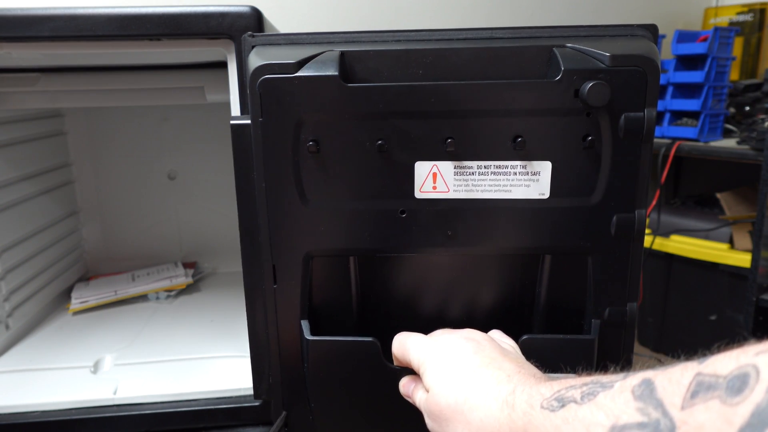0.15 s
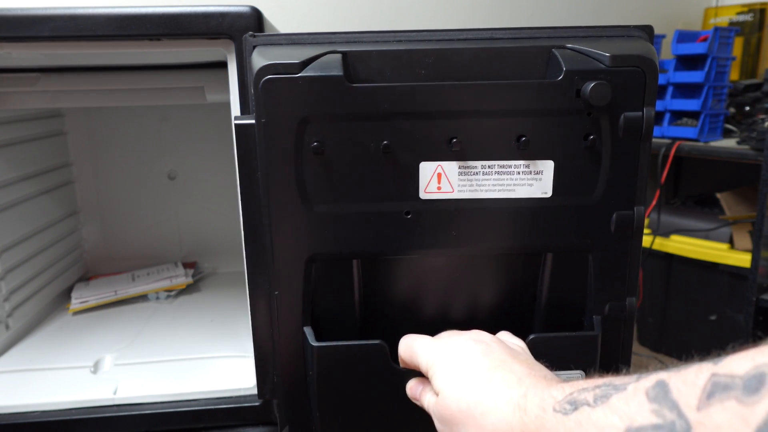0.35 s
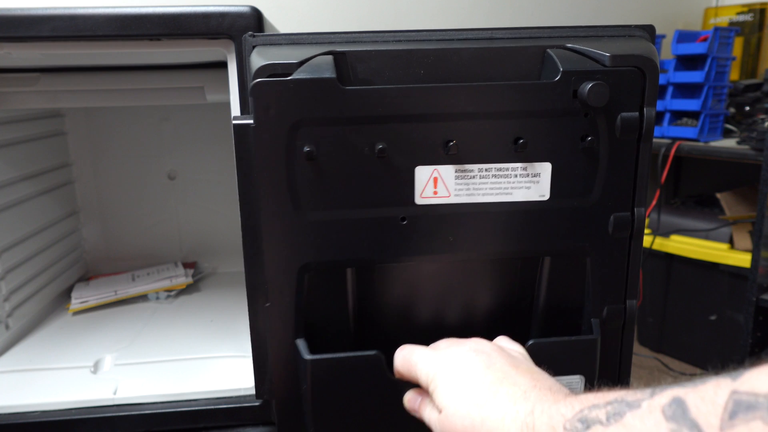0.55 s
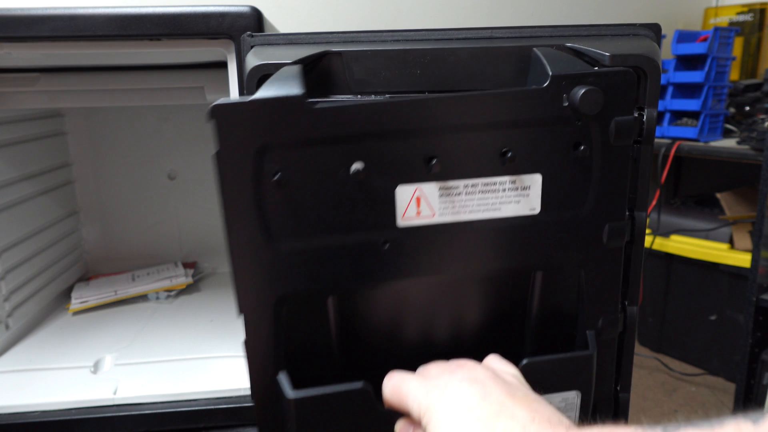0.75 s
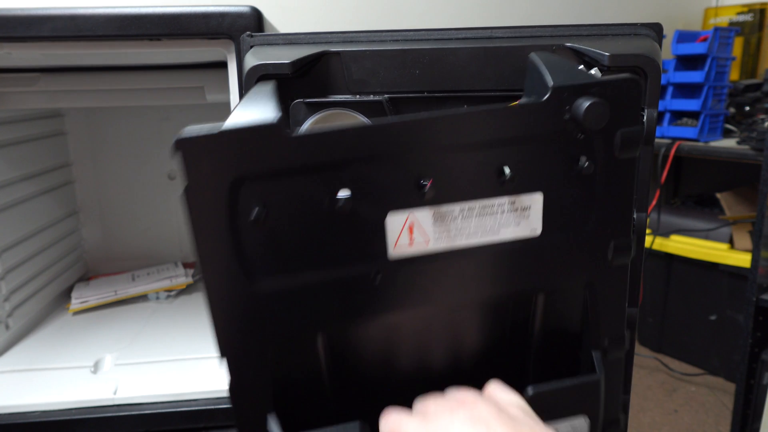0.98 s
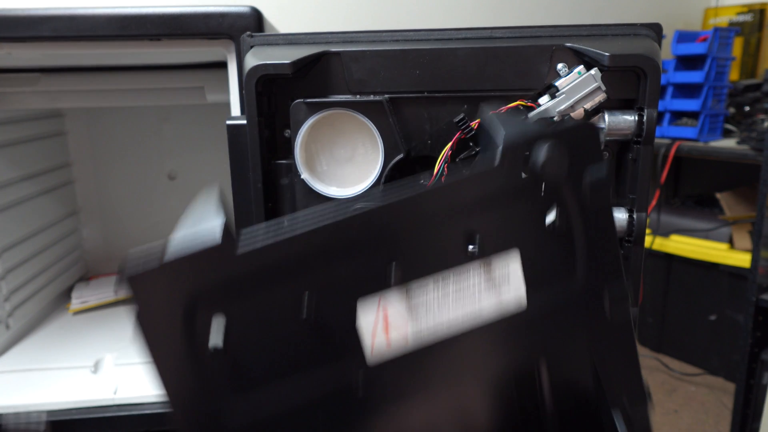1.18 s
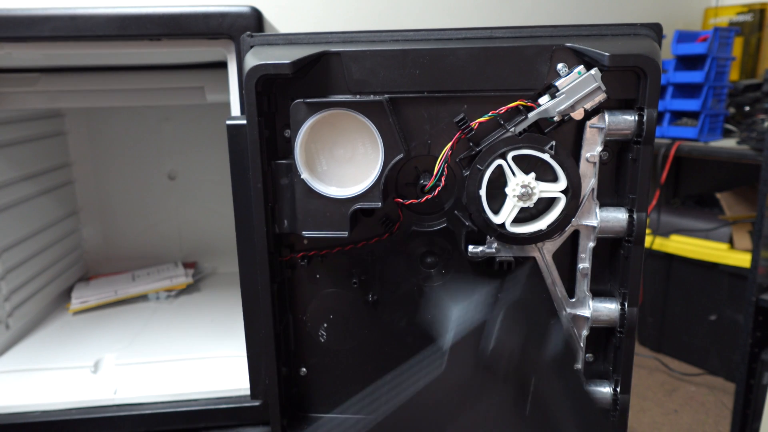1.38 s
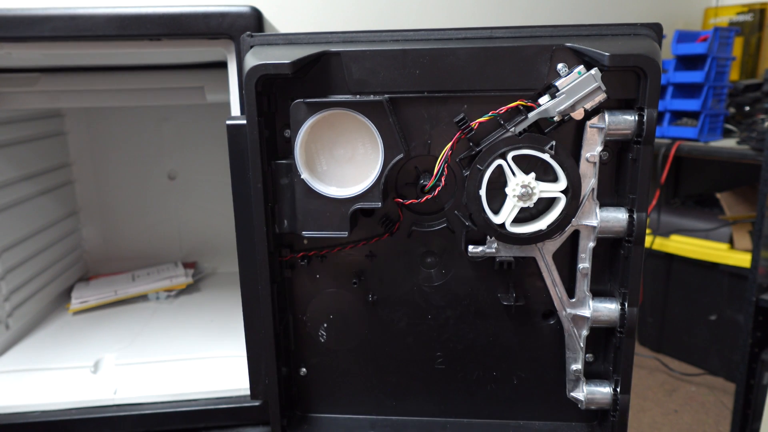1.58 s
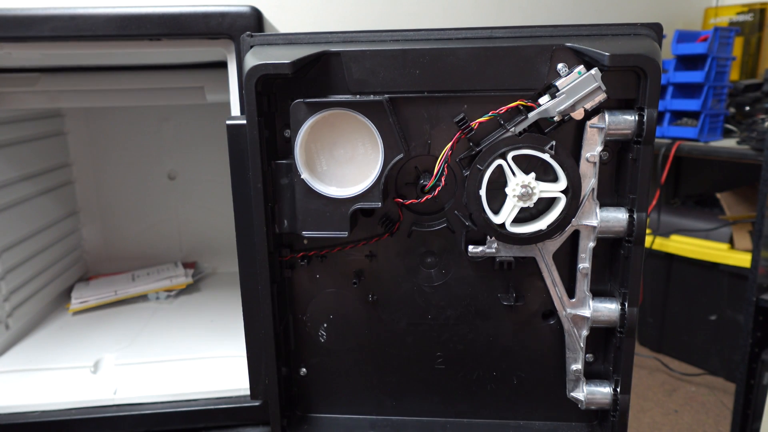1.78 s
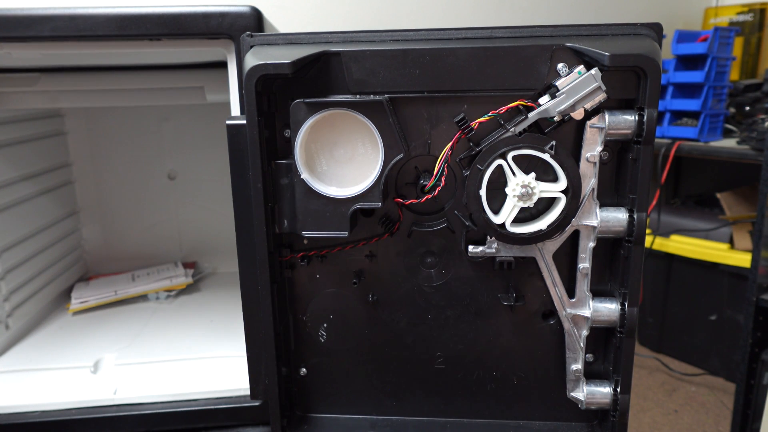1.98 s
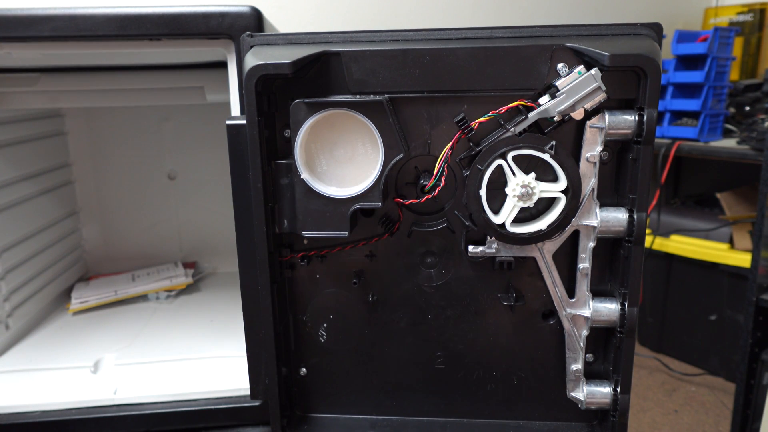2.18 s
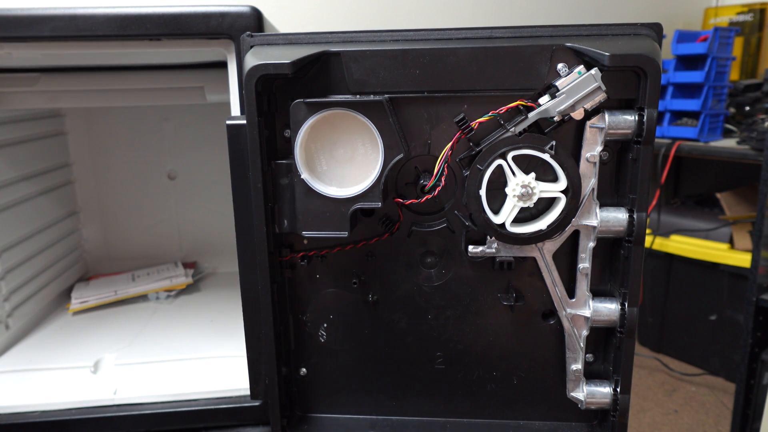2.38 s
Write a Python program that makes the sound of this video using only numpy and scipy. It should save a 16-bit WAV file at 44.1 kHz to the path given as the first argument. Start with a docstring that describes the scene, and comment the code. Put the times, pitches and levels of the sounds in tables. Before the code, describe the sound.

A hard plastic panel is pulled off a door, close in a small room with soft steady fan hum. After a faint knock at the start, a loud sharp snap at 0.24 s leads into rough grinding and hollow knocks, fading by 0.9. A quiet gap follows. At 1.47 it is set down with low thumps, bouncing until 1.85, sliding with a faint wavering squeak to 2.0; tiny metal clink at 2.14.

```python
"""A hand pulls a hard plastic panel off a metal door in a small room, while a fan hums throughout.
After faint knocks a clip snaps, and the panel grinds out of its seat with more knocks: each knock rings
the panel's own tones, and the grinding is a stream of tiny slips while the door booms along as low noise.
The panel is set down on the ground with low thumps, bounces, and slides with a faint squeak, a wavering
tone. Last, a small metal part clinks: short taps set its tones ringing. The fan is shaped noise with hum."""
import sys
import numpy as np
from scipy import signal
from scipy.fft import rfft, irfft, next_fast_len
from scipy.io import wavfile

SR = 44100
rng = np.random.default_rng(int(sys.argv[2]) if len(sys.argv) > 2 else 0)


def amplitude_ratio(level_db):
    """Convert a level in decibels to the matching linear amplitude (field) ratio."""
    exponent = np.asarray(level_db, float) / 20
    return 10 ** exponent


def wav_out(sig):
    """Save sig, one row per channel (or a flat mono array), as 16-bit PCM at SR to the path in sys.argv[1]."""
    wavfile.write(sys.argv[1], SR, np.round(np.clip(np.atleast_2d(sig).T, -1, 1) * 32767).astype(np.int16))


N = 108045

# how strongly the panel rubs while it is pulled out:
# (time [s], level at 250-1400 Hz [dB], level at 1400-4000 Hz [dB], level at 4-16 kHz [dB])
PULL_LEVELS = [(.244, -19.5, -19, -47), (.26, -14, -15.5, -28), (.30, -16, -16, -23.5),
               (.33, -16.5, -18, -25), (.37, -20.5, -22.5, -34.5), (.405, -18, -29.5, -40.5),
               (.425, -28.5, -23, -78), (.46, -18, -31, -47), (.50, -28.5, -33, -48),
               (.54, -35, -39.5, -51.5), (.575, -31.5, -38.5, -66), (.61, -35.5, -36.5, -50.5),
               (.63, -33.5, -27.5, -44), (.685, -31.5, -28, -40), (.72, -29.5, -56, -73),
               (.75, -40, -61, -76), (.80, -38, -45.5, -74.5), (.87, -51.5, -56.5, -62.5),
               (.95, -71.5, -69, -64)]
# colour of the grit and the cracks: (frequency [Hz], level per Hz [dB])
TREBLE_COLOUR = [(1800, -31.5), (3000, -8), (4200, 1.5), (6080, 0.5), (7930, -4), (8740, -1),
                 (10200, -14.5), (11800, -10), (13000, -15.5), (16500, -26.5)]


def rms_one(x):
    """Scale a signal to an rms (average strength) of 1."""
    return x / np.sqrt(np.mean(x ** 2) + 1e-20)


def in_time(rows):
    """Draw each column of a table as a curve over time, behind a gate open only within the table's span."""
    times, *columns = np.transpose(rows)
    t = np.arange(N) / SR
    to_nearest_end = np.minimum(t - times[0], times[-1] - t)
    gate = np.clip(to_nearest_end / 0.004, 0, 1)  # fades of 4 ms
    return [gate] + [np.interp(t, times, column) for column in columns]


def ring(x, hz, t60):
    """A unit click sets a sine of height 1 ringing; it fades by 60 dB in t60 seconds."""
    r = amplitude_ratio(-60 / (t60 * SR))
    w = 2 * np.pi * hz / SR
    return signal.lfilter([0, np.sin(w)], [1, -2 * r * np.cos(w), r * r], x + 1e-18)


def resonance(x, hz, width_hz):
    """A two-pole resonance favours sound near one frequency, with gain 1 at its top."""
    r = np.exp(-np.pi * width_hz / SR)
    top = np.array([1, 0, -1]) * (1 - r * r) / 2
    return signal.lfilter(top, [1, -2 * r * np.cos(2 * np.pi * hz / SR), r * r], x)


def coloured(x, points):
    """Shape a signal by a spectrum drawn on a log-frequency axis, then scale it to rms 1."""
    hz, db = np.transpose(points)
    f = np.fft.rfftfreq(len(x), 1 / SR) + 1
    gain = amplitude_ratio(np.interp(np.log(f), np.log(hz), db))
    return rms_one(irfft(rfft(x) * gain, len(x)))


def flutter(width_hz, size):
    """Slow random wandering of rms 1: noise through a two-pole low-pass."""
    r = np.exp(-np.pi * width_hz / SR)
    noise = rng.standard_normal(size + SR)
    return rms_one(signal.lfilter([1], [1, -2 * r, r * r], noise)[SR:])  # skip the filter's start


def grains(rate):
    """Random clicks of uneven size and either sign, on average `rate` per second."""
    spread_db = 2
    sizes = amplitude_ratio(spread_db * np.minimum(rng.exponential(1, N), 5)) * rng.choice([-1, 1], N)
    return sizes * (rng.random(N) < rate / SR)


def add(out, s, sound):
    """Mix a sound in at a time in seconds."""
    i = int(s * SR)
    out[i:i + len(sound)] += sound[:N - i]


def knocks():
    """Each knock rings the panel's tones near its colour, slightly shifted as the panel bends, with a dense
    body tail, a clack and a crack; softer contacts clack less, rise slower and colour narrower."""
    # knocks on the panel: (time [s], level [dB], centre of the contact's colour [Hz],
    # clack relative to the knock [dB], crack relative to the knock [dB], share of the full ring time [1])
    blows = [(.004, -15, 545, -40, -62, 0.4), (.005, -41, 1850, -72, -60, 0.82),
             (0.2418, 7, 840, -15, -9, 0.088), (0.279, 1, 595, -56, -45.5, 0.31),
             (0.321, 5, 825, -40, -50, 0.098), (0.388, -3.5, 690, -17, -41, 0.17),
             (.412, -1, 580, -19.5, -27, 0.22), (.417, 8.5, 640, -71.5, -43.5, 0.37),
             (.431, 0.5, 910, -37, -57, 0.28), (.463, -6, 1500, -11.5, -18.5, 0.13),
             (0.465, 7.5, 980, -37, -42, 0.15), (0.476, 7, 930, -41.5, -49, 0.14),
             (0.486, -7.5, 1010, -45, -46, 0.14), (.513, -14, 910, -25.5, -41, 0.21),
             (0.553, -30, 1030, -1.5, -1, 0.11), (.582, 6, 690, -46, -47, 0.17),
             (0.599, -10, 1000, -44, -60, 0.18), (0.6924, -15, 1200, -1, -18.5, 0.3),
             (.692, -12.5, 556, -41, -45, 0.88), (0.753, -13.5, 970, -13, -31, 0.43),
             (0.772, -13, 935, -15.5, -54, 0.27), (.857, -36.5, 1145, -11, -32, 0.24),
             (1.4649, -20.5, 1000, -17, -35.5, 0.14), (1.4688, -10, 1080, -17.5, -22, 0.33),
             (1.469, -18.5, 1850, -48.5, -65, 0.59), (1.478, -13.5, 1030, -12.5, -24, 0.37),
             (1.534, -33, 885, -6, -27, 0.4), (1.615, -23.5, 2880, -25.5, -18, 0.2),
             (1.618, -27.5, 2090, -40, -57.5, 0.41), (1.617, -32.5, 770, -26, -38, 1.0),
             (1.721, -12.5, 1500, -17.5, -29, 0.32), (1.73, -10.5, 1050, -29.5, -29, 0.36),
             (1.738, -6, 450, -48, -49.5, 0.23), (1.822, -21, 774, -32, -41, 0.54)]
    # tones of the panel: (frequency [Hz], level [dB], full 60 dB ring time before the share [s])
    panel_tones = [(355, -2, 0.23), (450, 2, 0.16), (594, 4, 0.13), (657, 2.5, 0.12), (842.7, 2.5, 0.12),
                   (1013, 8, 0.082), (1024, -3.5, 0.33), (1200, -10.5, 0.22), (1429, -6.5, 0.29),
                   (1850, -2.5, 0.17), (2090, -3, 0.22), (2610, -9.5, 0.077)]
    # hard edge of the contact: (frequency [Hz], width [Hz], level [dB])
    clack_peaks = [(2495, 120, 10), (2996, 410, 8), (3250, 250, -9)]
    hardest_rise_s, hardest_octaves = 0.00041, 1.31  # for a clack at 0 dB
    soft_slower, soft_narrower = 0.34, 0.21  # dB per dB of missing clack
    tone_spread_db, bend_share = 3, 0.02  # random level and pitch of each tone
    tones_db, body_db, tail_db = -7.5, -11.5, -17
    full_body_t60_s, clack_t60_s = 0.2, 0.024
    crack_t60_s, crack_tail_t60_s, crack_rise_s = 0.014, 0.071, 0.001

    out, t = np.zeros(N), np.arange(SR // 2) / SR
    for s, db, hz, clack_db, crack_db, share in blows:
        rise_s = hardest_rise_s * amplitude_ratio(-soft_slower * clack_db)
        rise = (1 - np.exp(-t / rise_s)) ** 2
        octaves = hardest_octaves * amplitude_ratio(soft_narrower * clack_db)

        tones = np.zeros(len(t))
        for f, tone_db, t60 in panel_tones:
            level_chance, bend_chance, phase = rng.standard_normal(3)
            # tones further from the knock's colour are weaker
            start_db = tone_db + tone_spread_db * level_chance - 5.66 * (np.log2(f / hz) / octaves) ** 2
            bent_hz = f * (1 + bend_share * bend_chance)
            tones += amplitude_ratio(start_db - 60 * t / (t60 * share)) * np.sin(2 * np.pi * bent_hz * t + phase)

        body = rng.standard_normal(len(t))
        for _ in range(3):
            body = resonance(body, hz, 2.07 * octaves * hz)
        tail = amplitude_ratio(-60 * t / (full_body_t60_s * share))
        body = rms_one(body) * tail

        edge_noise = rng.standard_normal(len(t))
        clack = rms_one(sum(amplitude_ratio(p) * resonance(resonance(edge_noise, f, w), f, 2 * w)
                            for f, w, p in clack_peaks))
        clack *= amplitude_ratio(-60 * t / clack_t60_s) + amplitude_ratio(tail_db) * tail

        crack = coloured(rng.standard_normal(len(t)), TREBLE_COLOUR)
        crack *= amplitude_ratio(-60 * t / crack_t60_s) + amplitude_ratio(tail_db - 60 * t / crack_tail_t60_s)
        crack *= np.minimum(t / crack_rise_s, 1)

        ringing = rise * (amplitude_ratio(tones_db) * tones + amplitude_ratio(body_db) * body)
        add(out, s, amplitude_ratio(db) * (ringing + amplitude_ratio(clack_db) * clack + amplitude_ratio(crack_db) * crack))
    return out


def rubbing(levels):
    """Dense small slips drive the panel's broad resonances; finer grit makes the treble."""
    # resonances under the rubbing, low and middle: (frequency [Hz], width [Hz], level [dB])
    low_peaks = [(418.4, 65, -6), (598, 83, 4), (630, 160, 1.5), (877, 150, 2), (976, 270, -1.5),
                 (1180, 230, -2)]
    mid_peaks = [(1430, 340, 0.5), (1840, 160, 1), (2270, 100, 0), (2774, 520, -3.5), (3047, 580, -4.5),
                 (3670, 1000, -12.5)]
    slips_per_s, grit_per_s = 1500, 21000

    def through(peaks):
        """Neighbouring resonances answer with opposite signs."""
        return rms_one(sum((-1) ** k * amplitude_ratio(p) * resonance(slips, f, w) for k, (f, w, p) in enumerate(peaks)))

    gate, low_db, mid_db, high_db = in_time(levels)
    slips = grains(slips_per_s)
    grit = coloured(grains(grit_per_s), TREBLE_COLOUR)
    return gate * (amplitude_ratio(low_db) * through(low_peaks) + amplitude_ratio(mid_db) * through(mid_peaks) + amplitude_ratio(high_db) * grit)


def door_boom():
    """The door rumbles while the panel grinds on it: low noise that follows the rubbing."""
    gate, db, *_ = in_time(PULL_LEVELS)
    rumble = rms_one(resonance(rng.standard_normal(N), 140, 170.0))
    return gate * amplitude_ratio(db - 19) * rumble  # 19 dB below the low rubbing


def squeak():
    """An edge sticks and slips: a wavering tone and a blurred band an octave up."""
    # the squeak's path: (time [s], pitch [Hz], level of the tone [dB], level of the octave band [dB])
    squeak_path = [(1.76, 1804, -37, -56), (1.80, 1810, -56, -49), (1.875, 1878, -38.5, -51.5),
                   (1.915, 1875, -50, -61), (1.93, 1840, -35, -64), (1.952, 1903, -34, -59),
                   (1.965, 1825, -52, -66), (2.02, 1850, -59, -71)]
    gate, hz, db, octave_db = in_time(squeak_path)
    phase = 2 * np.pi * np.cumsum(hz) / SR
    tone = (1 + flutter(70, size=N)) * np.sin(phase)
    octave = flutter(350, size=N) * np.sin(2 * phase)
    return gate * (amplitude_ratio(db) * tone + amplitude_ratio(octave_db) * octave)


def thumps():
    """Soft, unsteady low pushes of the door and the ground under the big blows: fading, wavering sines."""
    # low booms: (time [s], level [dB], frequency [Hz], 60 dB fade time [s])
    booms = [(0.24, -34.5, 60, .15), (1.47, -27.5, 163, 0.27), (1.467, -23, 231, 0.16),
             (1.47, -25, 338.7, 0.14), (1.476, -48.5, 60.3, 0.97), (1.62, -23, 169, 0.054),
             (1.646, -30.5, 213, 0.097), (1.74, -25, 235.2, 0.42), (1.784, -27.5, 336.3, 0.3),
             (1.732, -27, 426, 0.38), (1.814, -27.5, 227, 0.14), (1.853, -36, 229.6, 0.23)]
    waver_depth, waver_hz, rise_s = 0.4, 30, 0.0022
    out, t = np.zeros(N), np.arange(SR // 2) / SR
    for s, db, hz, t60 in booms:
        waver = waver_depth * (1 - np.exp(-t * waver_hz)) * flutter(waver_hz, size=len(t))
        # the same waver, run backwards, unsettles the phase
        tone = np.sin(2 * np.pi * hz * t + waver[::-1])
        add(out, s, amplitude_ratio(db - 60 * t / t60) * (1 + waver) * tone * np.minimum(t / rise_s, 1))
    return out


def clink():
    """A small metal part taps and bounces: a click with a short burst of noise rings its tones."""
    # taps of the metal part: (time [s], level [dB])
    taps = [(2.142, -33), (2.154, -45)]
    # tones of the metal part: (frequency [Hz], level [dB], 60 dB ring time [s])
    metal_tones = [(2961, -18, 0.37), (3127, -21.5, 0.33), (4370, -25.5, 0.2), (5130, -21, 0.033),
                   (5421, -19, 0.12), (6417, -19, 0.18), (6600, -15, 0.09), (6880, -27, 0.22),
                   (7350, -26, 0.25)]
    out, t = np.zeros(N), np.arange(SR // 2) / SR
    tap = (t == 0) + 0.19 * rng.standard_normal(len(t)) * np.exp(-t / 0.005)
    for s, db in taps:
        # each tone varies by 1.5 dB from tap to tap
        ringing = sum(amplitude_ratio(tone_db + 1.5 * rng.standard_normal()) * ring(tap, hz, t60)
                      for hz, tone_db, t60 in metal_tones)
        add(out, s, amplitude_ratio(db) * ringing)
    return out


def room(x):
    """Echoes between the walls: ten feedback delays, duller on every round."""
    t60_s, wall_cut_hz = 0.29, 9000
    size = next_fast_len(N + SR)
    w = 2 * np.pi * np.fft.rfftfreq(size)
    dull = 1 / (1 + 1j * w * SR / (2 * np.pi * wall_cut_hz))
    echoes = 0
    for k, lag_s in enumerate(rng.uniform(0.0087, 0.03, size=10)):
        one_round = amplitude_ratio(-60 * lag_s / t60_s) * dull * np.exp(-1j * w * lag_s * SR)
        echoes = echoes + (-1) ** k * one_round / (1 - one_round)  # all rounds added up
    return irfft(rfft(x, size) * echoes, size)[:N]


def background():
    """Fan air is noise with a drawn spectrum; mains hum is noise squeezed into narrow bands."""
    # colour of the fan air: (frequency [Hz], level per Hz [dB])
    air_colour = [(15, -38), (25, -4.5), (103, -9.5), (150, -4), (182, -3.5), (380, -9), (470, -9.5),
                  (854, -19.5), (1360, -20.5), (1880, -25.5), (16500, -41.5)]
    # mains hum: (frequency [Hz], level [dB])
    hum_tones = [(120, -70), (240, -59.5)]
    hum = sum(amplitude_ratio(db) * rms_one(resonance(rng.standard_normal(N), hz, 5.2)) for hz, db in hum_tones)
    return amplitude_ratio(-52.5) * coloured(rng.standard_normal(N), air_colour) + hum


def scene():
    """Panel and metal in the room, over the background; the thin panel radiates little bass."""
    # how strongly the panel slides on the ground:
    # (time [s], level at 250-1400 Hz [dB], level at 1400-4000 Hz [dB], level at 4-16 kHz [dB])
    slide_levels = [(1.74, -36, -54, -58), (1.80, -33.5, -43, -56.5), (1.86, -45, -49.5, -53.5),
                    (1.915, -41, -44.5, -56), (1.94, -30, -38.5, -65), (1.96, -32.5, -36.5, -53.5),
                    (1.985, -37, -34, -52.5), (2.03, -41, -48, -57.5), (2.07, -42.5, -49.5, -65),
                    (2.13, -46.5, -50, -59), (2.2, -54.5, -59.5, -58.5), (2.44, -70, -59.5, -70)]
    panel = knocks() + rubbing(PULL_LEVELS) + rubbing(slide_levels) + squeak()
    little_bass = signal.butter(4, 190, "high", fs=SR, output="sos")
    near = signal.sosfilt(little_bass, panel) + door_boom() + thumps() + clink()
    return (near + amplitude_ratio(-20) * room(near) + background())[None]


def band_limit(x):
    """A steep low-pass at the top of the band."""
    return signal.sosfilt(signal.butter(12, 17150, fs=SR, output="sos"), x)


def record(dry):
    """The loudest snap overloads the input, which bends its peaks over softly; the top is cut."""
    overload = 0.97  # no peak passes this height
    clipped = dry / (1 + (dry / overload) ** 6) ** (1 / 6)
    top_cut = signal.cheby2(16, 100, 16900, fs=SR, output="sos")
    mix = signal.sosfilt(top_cut, clipped)
    return band_limit(mix)


dry = scene()
out = record(dry)
wav_out(out)
```